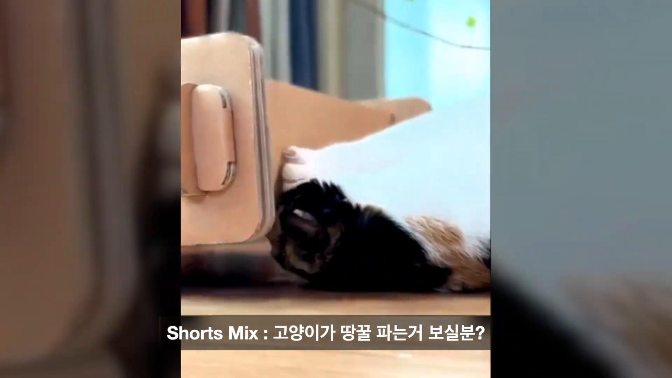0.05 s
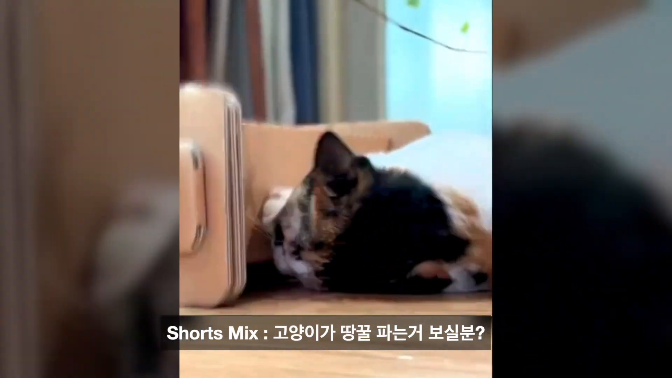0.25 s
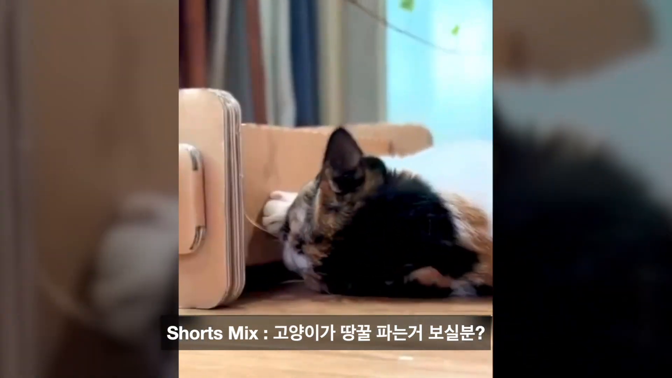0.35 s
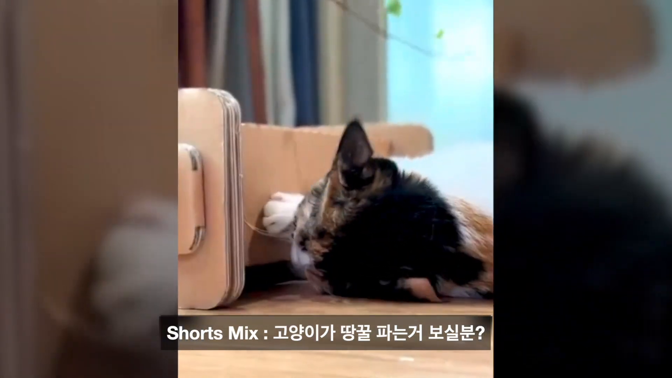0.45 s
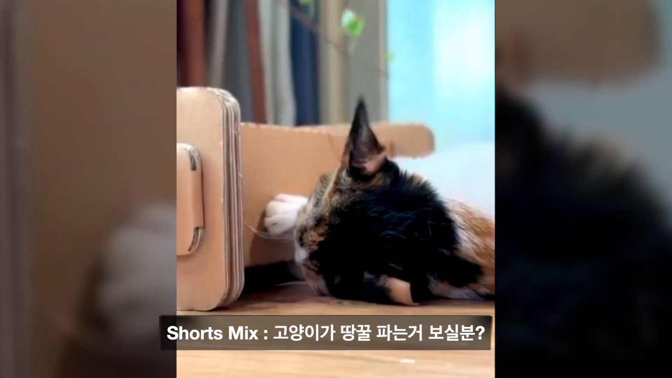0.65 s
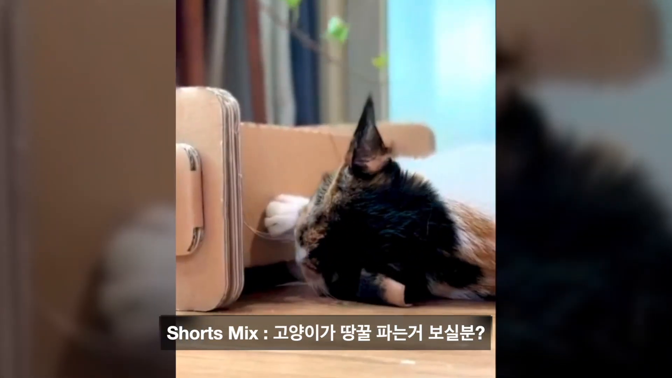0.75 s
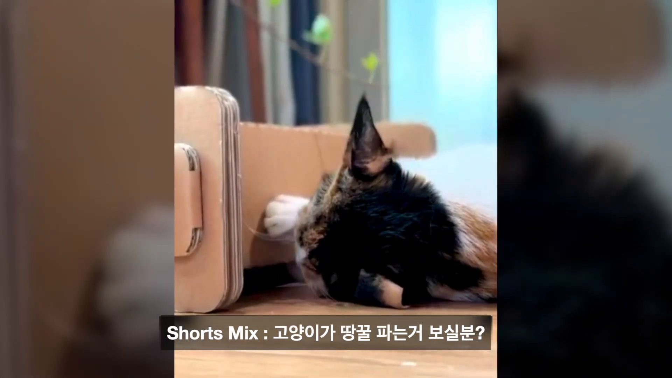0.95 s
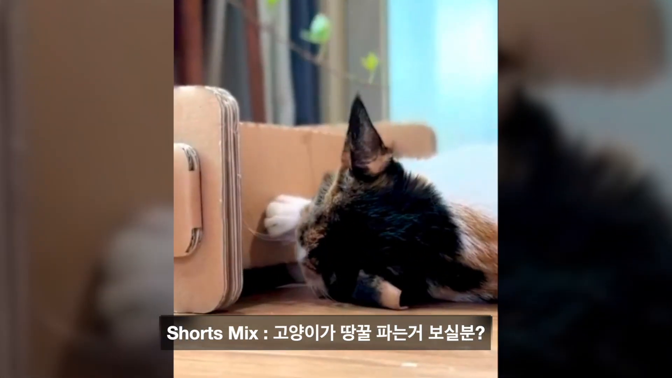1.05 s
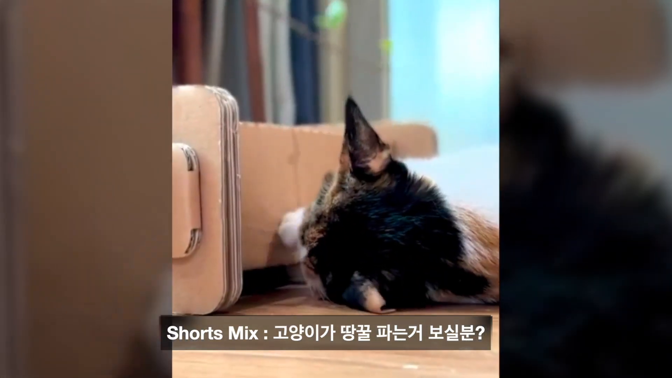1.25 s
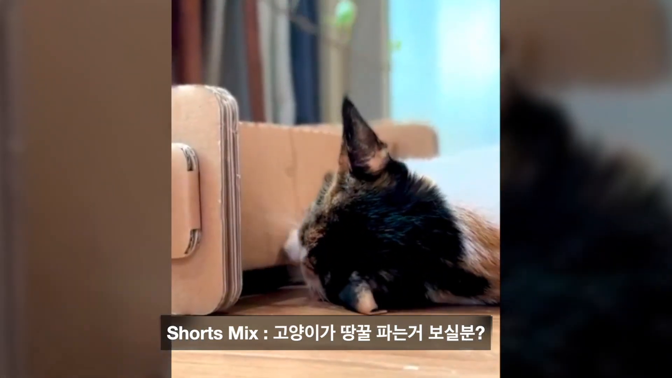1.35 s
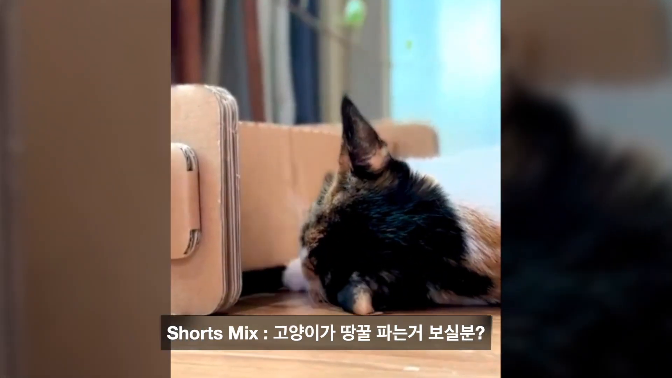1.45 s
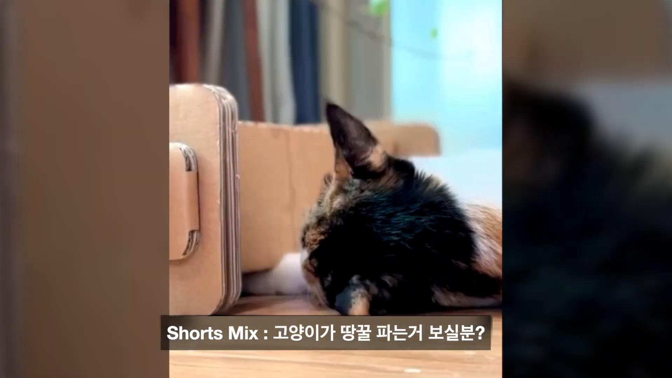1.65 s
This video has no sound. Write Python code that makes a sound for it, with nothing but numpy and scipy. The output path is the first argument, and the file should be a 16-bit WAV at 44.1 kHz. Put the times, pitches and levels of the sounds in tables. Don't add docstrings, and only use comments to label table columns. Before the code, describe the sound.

A cardboard box knocks once, hollow and woody, amid brief claw scraping and faint rustling indoors.

```python
import sys
import numpy as np
from scipy import signal
from scipy.fft import rfft, irfft
from scipy.io import wavfile
from scipy.ndimage import uniform_filter1d

SR = 44100
rng = np.random.default_rng(int(sys.argv[2]) if len(sys.argv) > 2 else 0)


def wrap_up_sound(samples):
    columns = np.atleast_2d(samples).T
    tamed = np.clip(columns, -1, 1)
    steps = np.round(tamed * 32767).astype(np.int16)
    wavfile.write(sys.argv[1], SR, steps)


def boost_factor(decibels):
    exponent = np.asarray(decibels, float) / 20
    return 10 ** exponent


N = 74970

KNOCK_S = 0.2443
PAN_DB = 3
ALIKE_HZ = 500


def unit(x):
    return x / np.sqrt(np.mean(x ** 2))


def curve(rows, at, log=False):
    a, b = np.array(rows, float).T
    return np.interp(np.log(at), np.log(a), b) if log else np.interp(at, a, b)


def band(x, hz, width):
    return signal.lfilter(*signal.iirpeak(min(hz, 0.45 * SR), max(hz / width, 0.3), SR), x)


def resonate(x, hz, width):
    return unit(band(band(x, hz, width), hz, width))


def walk(rate):
    hold = int(SR / rate)
    steps = np.repeat(rng.standard_normal(N // hold + 1), hold)
    return 1.1 * uniform_filter1d(uniform_filter1d(steps, hold), hold)[:N]


def pair(hz, width, size=N):
    mid, side = band(rng.standard_normal((2, size)), hz, width)
    alike = 1 / (1 + (hz / ALIKE_HZ) ** 2)
    return unit(np.sqrt(1 + alike) * mid + np.sqrt(1 - alike) * side * np.array([[1], [-1]]))


def ports(x, pan_db):
    lag_s = 0.00017
    hz = np.fft.rfftfreq(N, 1 / SR)
    side = np.array([[-0.5], [0.5]])
    delay = np.exp(-2j * np.pi * hz * lag_s * side)
    shade = boost_factor(-side * pan_db * hz / (hz + ALIKE_HZ))
    return irfft(rfft(x) * delay * shade, N)


def ring(t, hz, t60, rise):
    t = np.maximum(t, 0)
    return (1 - np.exp(-t / rise)) * 1000. ** (-t / t60) * np.sin(2 * np.pi * hz * t)


def glide(u, hz, level):
    on = (u >= 0) & (u < level[-1][0])
    return on * boost_factor(curve(level, u)) * np.sin(2 * np.pi * np.cumsum(on * hz) / SR)


def friction(t, effort, rings, rate, patchy_db):
    slips = (rng.random((2, N)) < rate / SR) * rng.standard_normal((2, N))
    slips = ports(slips[0], PAN_DB / 2) + 0.31 * slips[1] * np.array([[1], [-1]])
    sound = 0
    for hz, width, db in rings:
        sound = sound + boost_factor(db + patchy_db * walk(25)) * resonate(slips, hz, 1.34 * width)
    return unit(sound) * boost_factor(curve(effort, t))


def hum():
    # f/Hz, level/dB per Hz
    hum_colour = [(25, -14), (60, 0), (200, -6), (600, -16), (1200, -34), (3500, -39), (6800, -35),
                  (11800, -39)]
    out = 0
    for hz in 28 * 2 ** np.arange(0, 8.8, 1 / 3):
        flicker = boost_factor(curve(hum_colour, hz, True) + 1.8 * walk(12))
        out = out + flicker * np.sqrt(hz) * pair(hz, hz / 5)
    return unit(out) * boost_factor(-58)


def drag(t):
    # t/s, level/dB
    drag_effort = [(0, -75), (.07, -58.5), (.12, -53), (.19, -47), (.24, -47), (0.358, -86), (0.619, -58),
                   (.72, -71), (.88, -66.5), (0.998, -75), (1.27, -100), (1.5, -92), (1.58, -68.5),
                   (1.7, -67)]
    # f/Hz, width/Hz, level/dB
    drag_rings = [(1500, 1800, 6), (1960, 760, 14.5), (2600, 800, -28)]
    return friction(t, drag_effort, drag_rings, rate=1500, patchy_db=2.1)


def shuffle(t):
    # t/s, level/dB
    shuffle_effort = [(0, -66), (.05, -62), (.2, -50), (.45, -56.5), (.6, -66.5), (.78, -63.5), (.9, -65),
                      (1, -86), (1.5, -77.5), (1.7, -58)]
    # f/Hz, width/Hz, level/dB
    shuffle_rings = [(335, 340, -2), (614, 230, -5), (956, 540, -3)]
    return friction(t, shuffle_effort, shuffle_rings, rate=800, patchy_db=2.1)


def rustle(t):
    # t/s, level/dB
    rustle_effort = [(0, -65.5), (.12, -65), (0.212, -51), (0.308, -48.5), (0.369, -61), (.55, -62),
                     (.72, -74.5), (0.879, -59.5), (1.05, -74), (1.35, -79.5), (1.7, -66.5)]
    # f/Hz, width/Hz, level/dB
    rustle_rings = [(4300, 3400, 1.5), (6634, 1800, 1), (8090, 1900, -1), (10170, 5000, -9.5)]
    return friction(t, rustle_effort, rustle_rings, rate=6000, patchy_db=1.8)


def ticks(t):
    # t/s, level/dB, f/Hz, t60/s, pan/dB
    claw_ticks = [
        (.033, -45.5, 765, 0.031, -1),
        (0.098, -40, 2374, 0.0098, 18),
        (0.5287, -51, 6300, 0.0086, 6),
        (.5307, -50.5, 2050, 0.011, 16),
        (0.645, -60, 4300, 0.011, -16),
        (0.7518, -46, 1500, 0.0058, 12),
        (.881, -65.5, 4800, 0.0084, -2.5),
        (1.167, -59, 4050, 0.0056, -30.5),
        (1.243, -62, 7640, 0.0098, -10.5),
    ]
    # t/s, level/dB, f/Hz, t60/s, pan/dB
    firm_tap = [
        (1.1690, -32, 1450, .006, 1.5),
        (1.1698, -44, 800, .014, 1.5),
        (1.1700, -50, 480, .03, 1.5),
    ]
    out = 0
    for start, db, hz, t60, pan_db in [*claw_ticks, *firm_tap]:
        u = np.maximum(t - start, 0)
        noise = resonate(rng.standard_normal(N), hz, 1.6 * hz)
        grit = min(hz / 9000, 0.6) * (t > start) * 1000. ** (-u / (3.5 * t60)) * noise
        out = out + ports(boost_factor(db) * (ring(u, hz, t60, 0.00017) + grit), pan_db)
    return out


def rocks(t):
    # t/s, level/dB, f/Hz, length/cycles
    bumps = [(.036, -47, 499, 5), (.044, -47, 242.6, 5.3), (0.205, -40.5, 77, 7.2), (.248, -17, 250, 3.8),
             (.343, -32, 85.4, 3), (0.386, -32.5, 87, 1.23), (0.471, -48, 72, 5.7),
             (.535, -50.5, 225.8, 6.6), (.565, -44, 100, 3), (0.754, -52.5, 70, 3.6),
             (.865, -54.5, 75, 2.9), (1.081, -60, 70, 1.4)]
    out = 0
    for start, db, hz, cycles in bumps:
        progress = np.clip((t - start) * hz / cycles, 0, 1)
        swell = np.sin(np.pi * progress ** 0.61)
        out = out + boost_factor(db) * swell * np.sin(2 * np.pi * hz * (t - start))
    return out


def bending_wave(t):
    # t/s, level/dB
    sweep_level = [(0, -14.5), (.002, -2.5), (.0035, -3), (.0052, -0.5), (.007, -29), (0.011, -50)]
    end_hz, extra_hz, fall_s = 328.3, 2960, 0.002868 / 2
    u = t - KNOCK_S
    return boost_factor(-5.5) * glide(u, end_hz + extra_hz * np.exp(-np.maximum(u, 0) / fall_s), sweep_level)


def floor_boom(t):
    # t/s, level/dB
    boom_level = [(0, -10), (.004, -17), (.03, -15.5), (.043, -18.5), (.052, -40), (.09, -52)]
    late_s, top_hz, end_hz, fall_s = 0.0035, 159.4, 72, 0.012
    u = t - KNOCK_S - late_s
    sag = np.exp(-np.maximum(np.maximum(t - KNOCK_S, 0) - late_s, 0) / fall_s)
    return -glide(u, end_hz + (top_hz - end_hz) * sag, boom_level)


def box_body(t):
    # f/Hz, level/dB, t60/s
    box_modes = [(180.5, -5.5, 0.16), (275.3, -13, 0.19), (411.5, -5.5, 0.091), (595, -8, 0.041),
                 (695.4, -9.5, 0.1), (808.6, -10.5, 0.12), (1040, -12.5, 0.061), (1244, -19.5, 0.28)]
    late_s_at_100hz = 0.008
    u = np.maximum(t - KNOCK_S, 0)
    out = 0
    for k, (hz, db, t60) in enumerate(box_modes):
        late = late_s_at_100hz * np.sqrt(100 / hz)
        out = out + (-1) ** k * boost_factor(db) * ring(u - late, hz, t60, 0.0009)
    return boost_factor(-12.5) * out


def knock(t):
    u = np.maximum(t - KNOCK_S, 0)
    noise = unit(band(rng.standard_normal(N), 5500, 7000))
    crack = (u > 0) * boost_factor(-27.5) * 1000. ** (-u / 0.041) * noise
    return bending_wave(t) + floor_boom(t) + crack + box_body(t)


def flap(t):
    # f/Hz, level/dB, t60/s
    flap_modes = [(520, -17, .05), (1000, -15, .03), (1320, -20, .04), (1750, -24, .04)]
    modes = sum(boost_factor(db) * ring(t - KNOCK_S - 0.9 / hz, hz, t60, 0.0008) for hz, db, t60 in flap_modes)
    return modes * np.array([[1.2], [-0.8]])


def crunch(t):
    u = np.maximum(t - KNOCK_S, 0)
    noise = resonate(rng.standard_normal((2, N)), 2130, 1700)
    fade = np.clip(u / 0.0013, 0, 1) * 1000. ** (-u / 0.04)
    return boost_factor(-30) * fade * (noise + noise[::-1])


def room(x):
    # f/Hz, t60/s
    room_t60 = [(60, 0.74), (250, 0.21), (600, 0.416), (1100, 0.47), (1600, 0.16), (2800, 0.65),
                (7500, 0.29)]
    # f/Hz, level/dB
    room_colour = [(60, -13.5), (250, -6), (600, -5), (1100, -4), (1600, -2.5), (2800, -2), (4500, -9.5),
                   (7500, -3.5)]
    u = np.arange(SR // 2) / SR
    tail = 0
    for hz in 60 * 2 ** np.arange(0, 7.6, 0.5):
        decay = 1000. ** (-u / curve(room_t60, hz, True))
        gain = boost_factor(curve(room_colour, hz, True)) * np.sqrt(hz)
        tail = tail + gain * pair(hz, hz / 3, size=len(u)) * decay
    tail = tail * np.clip(u / 0.00517, 0, 1)
    tail = tail / np.sqrt(np.sum(tail ** 2) / 2)
    return boost_factor(-10.5) * signal.fftconvolve(x[None], tail)[:, :N]


def scene():
    t = np.arange(N) / SR
    blow, tips = knock(t), ticks(t)
    box = ports(blow + rocks(t), PAN_DB) + flap(t) + crunch(t)
    rubbing = drag(t) + shuffle(t) + rustle(t)
    return hum() + rubbing + tips + box + room(blow + tips[0] / 2)


def thin(x, size=2048, count=8):
    # low edge, high edge f/Hz
    faint_hz = [7300, 9800]
    weak_db, faint_db, hole_db, holes_from_hz = -2.6, -113, -16, 850
    hz, _, s = signal.stft(x, SR, nperseg=size, noverlap=size * 3 // 4)
    power = (np.abs(s[:-1]) ** 2).reshape(-1, count, s.shape[1]).mean(axis=1)
    db = uniform_filter1d(10 * np.log10(power + 1e-20), size=4, axis=1)
    around = uniform_filter1d(uniform_filter1d(db, size=7, axis=0), size=9, axis=1)
    weak = db - around < weak_db
    centre = hz[:-1:count, None]
    floor_db = faint_db + (centre - faint_hz[0]) / 250
    faint = uniform_filter1d(db, size=3, axis=0) < floor_db
    faint = faint & (centre > faint_hz[0]) & (centre < faint_hz[1])
    gain = np.where((weak | faint) & (centre > holes_from_hz), boost_factor(hole_db), 1)
    s[:-1] *= np.repeat(gain, count, axis=0)
    return signal.istft(s, SR, nperseg=size, noverlap=size * 3 // 4)[1][:N]


def band_limit(x):
    return signal.sosfilt(signal.butter(12, 13050, fs=SR, output="sos"), x)


def record(dry):
    # low edge, high edge f/Hz
    gap_hz = [8900, 9800]
    x = signal.sosfilt(signal.butter(2, 34, "high", fs=SR, output="sos"), dry)
    x = signal.sosfilt(signal.ellip(2, 1, 20, gap_hz, "bandstop", fs=SR, output="sos"), x)
    x = signal.sosfilt(signal.ellip(8, 0.2, 50, 11500, fs=SR, output="sos"), x)
    mid, side = thin((x[0] + x[1]) / 2), thin((x[0] - x[1]) / 2)
    side = signal.sosfiltfilt(signal.ellip(6, 0.2, 30, 10000, fs=SR, output="sos"), side)
    return band_limit(np.array([mid + side, mid - side]))


dry = scene()
out = record(dry)
wrap_up_sound(out)
```